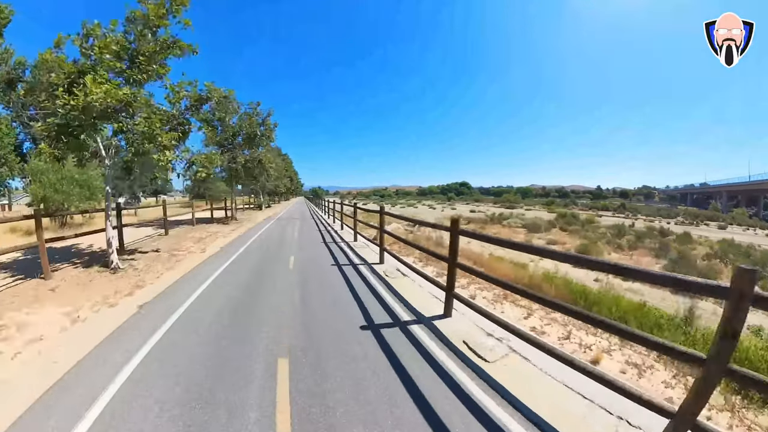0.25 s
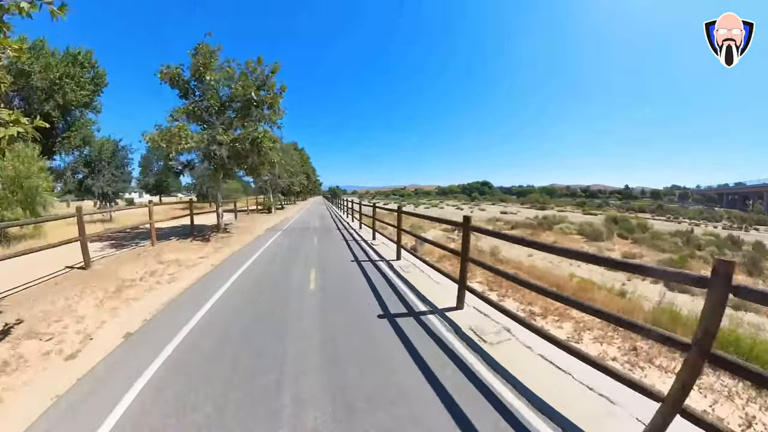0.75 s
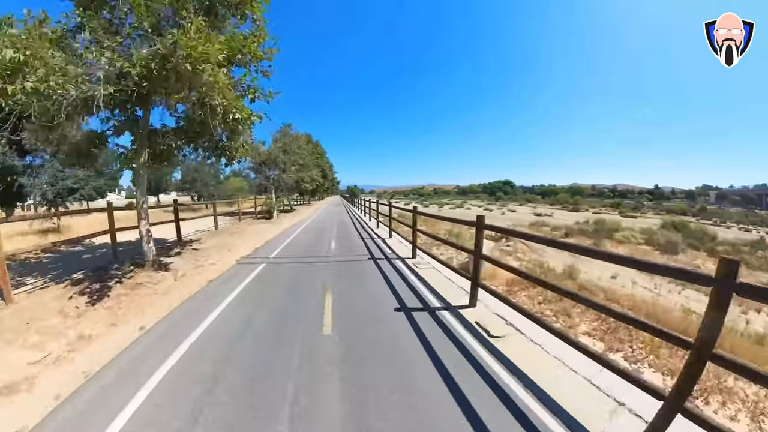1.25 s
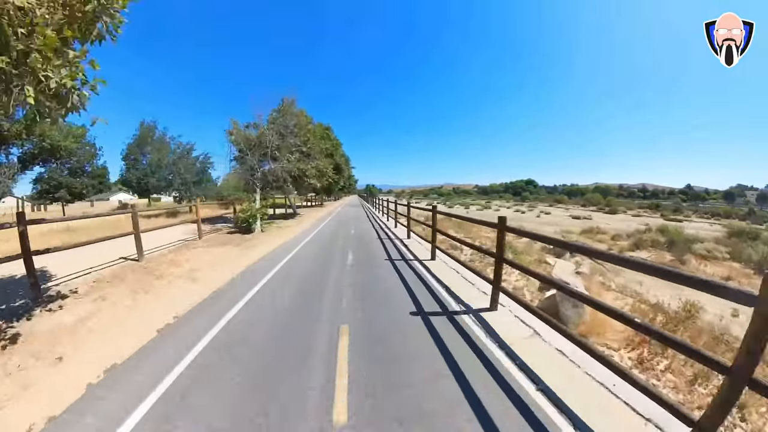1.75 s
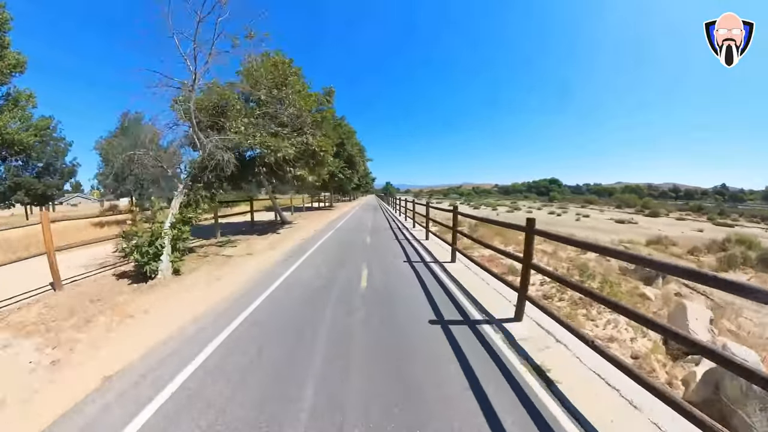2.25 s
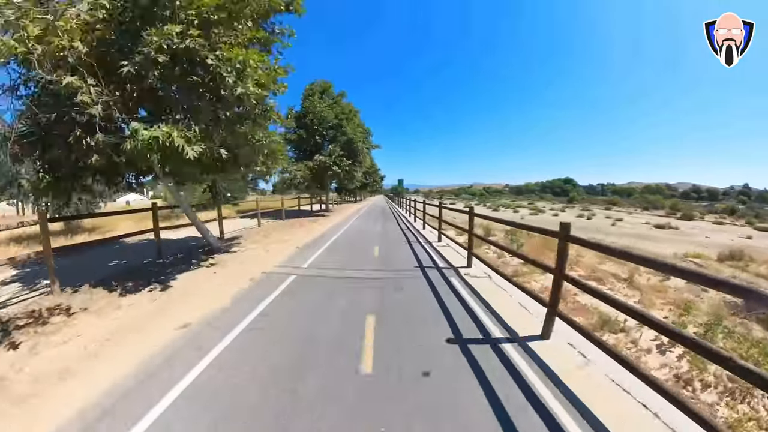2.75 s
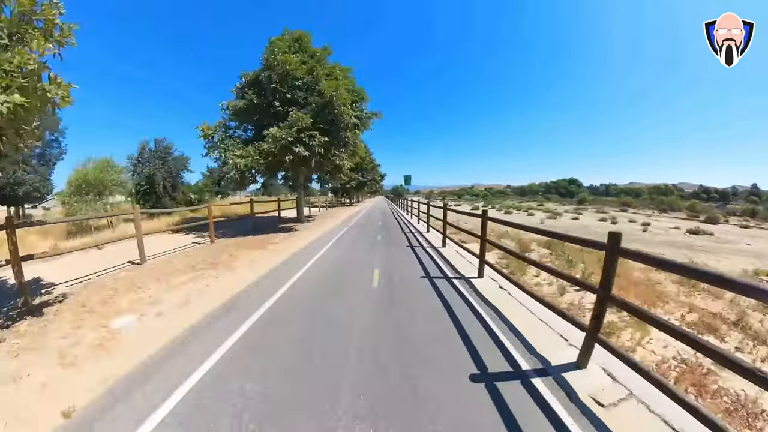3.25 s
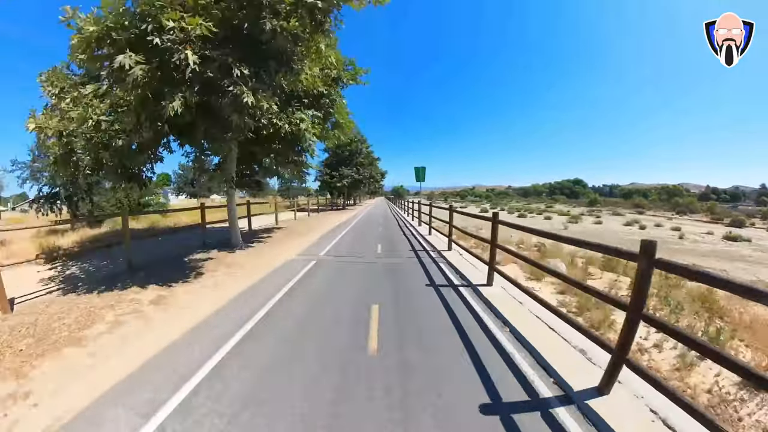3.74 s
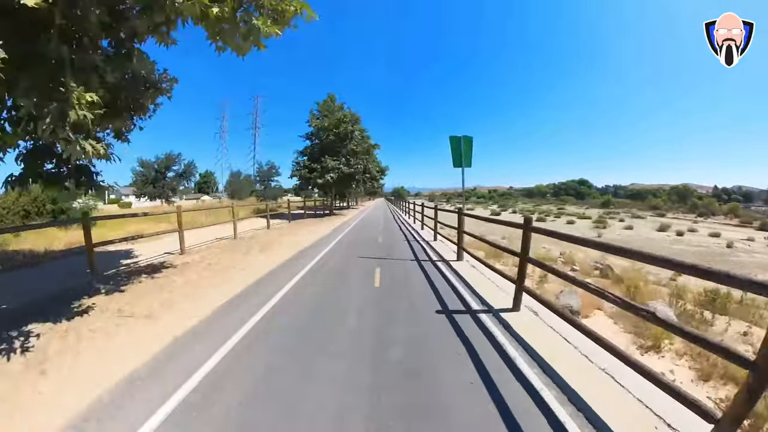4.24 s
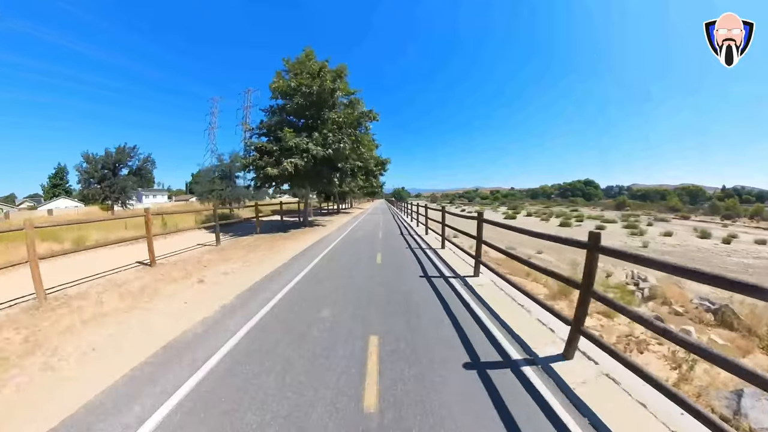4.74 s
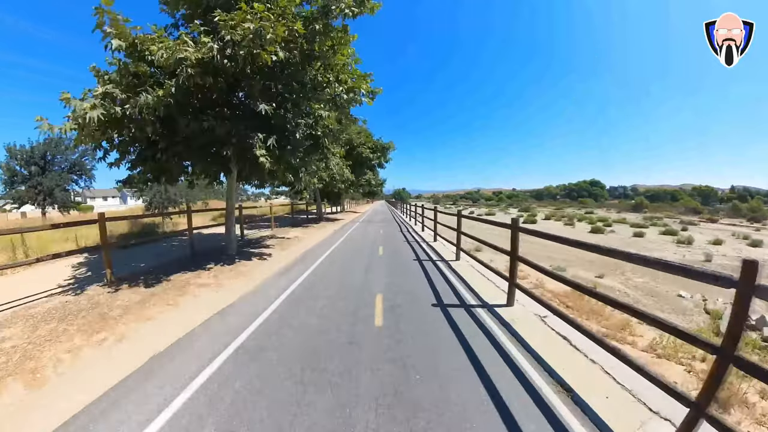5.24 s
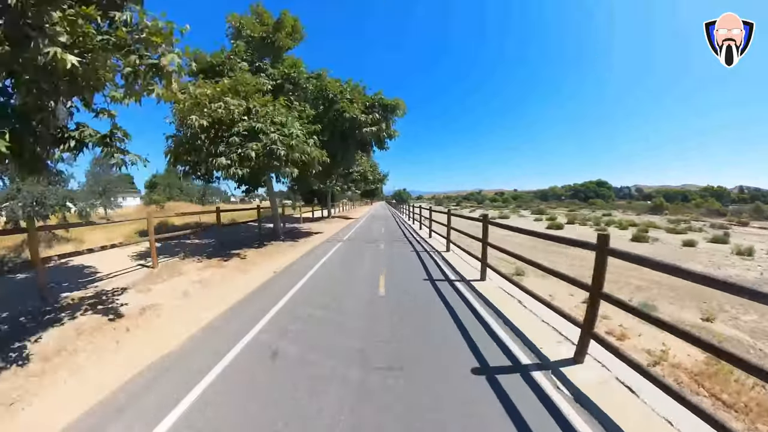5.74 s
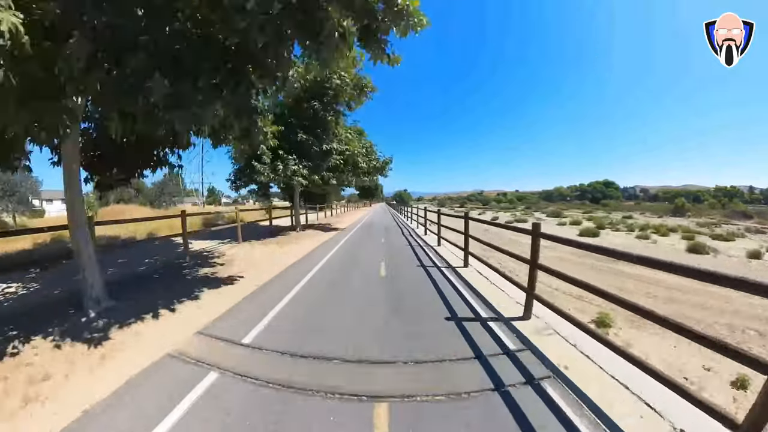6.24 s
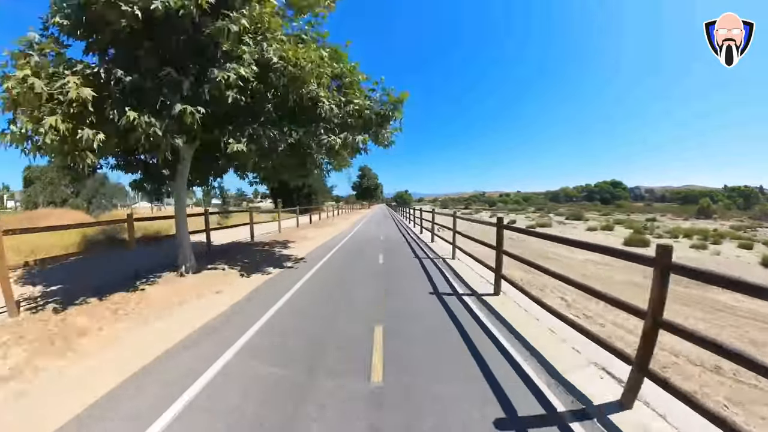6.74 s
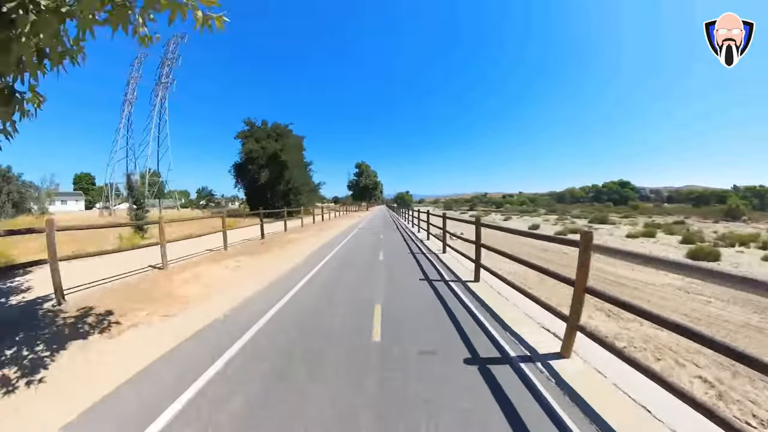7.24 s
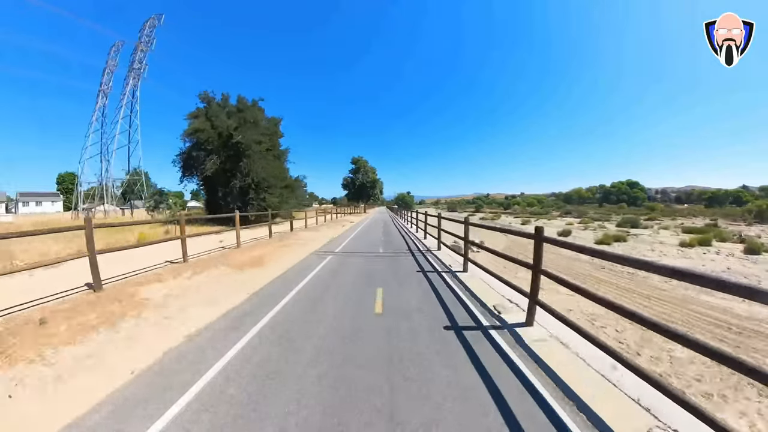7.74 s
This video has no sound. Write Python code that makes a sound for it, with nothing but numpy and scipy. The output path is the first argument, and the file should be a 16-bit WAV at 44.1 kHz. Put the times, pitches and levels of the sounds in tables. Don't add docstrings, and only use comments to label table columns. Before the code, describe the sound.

Close on the handlebar of a speeding electric scooter: motor hum climbs in pitch over booming asphalt and buffeting wind, with three hard seam thuds.

```python
import sys
import numpy as np
from scipy import signal
from scipy.fft import rfft, irfft, next_fast_len
from scipy.io import wavfile
from scipy.ndimage import uniform_filter1d, map_coordinates

SR = 44100
rng = np.random.default_rng(int(sys.argv[2]) if len(sys.argv) > 2 else 0)


def generate_wav(sig):
    pcm = np.round(np.clip(np.atleast_2d(sig).T, -1, 1) * 32767).astype(np.int16)
    wavfile.write(sys.argv[1], SR, pcm)


def volts_from_db(level):
    exponent = np.asarray(level, float) / 20
    return 10 ** exponent


N = 352359


def unit(x):
    return x / np.sqrt(np.mean(x ** 2) + 1e-20)


def along(points, hz):
    f, v = np.transpose(points)
    return np.interp(np.log(hz + 1), np.log(f + 1), v, left=-120, right=-120)


def curves(rows):
    s, *cols = np.transpose(rows)
    return [np.interp(np.arange(N) / SR, s, c) for c in cols]


def wobble(rate):
    coarse = np.arange(0, N + 32, 32)
    knots = rng.standard_normal(1600)
    return np.interp(np.arange(N), coarse, map_coordinates(knots, [coarse * rate / SR]))


def swells(rows):
    t = np.arange(N) / SR
    return sum(db * np.exp(-((t - s) / half) ** 2) for s, half, db in rows)


def filtered(x, response):
    m = next_fast_len(N + SR // 2)
    return irfft(rfft(x, m) * response(np.fft.rfftfreq(m, 1 / SR)), m)[:N]


def resonances(peaks):
    return lambda f: sum((-1) ** k * volts_from_db(db) * 1j * f * w / (c * c - f * f + 1j * f * w)
                         for k, (c, w, db) in enumerate(peaks))


def rush(spectrum, patchy_db):
    z = signal.stft(rng.standard_normal(N), nperseg=512)[2]
    field = uniform_filter1d(rng.standard_normal(z.shape), size=8, axis=0)
    field = uniform_filter1d(field, size=6, axis=1)
    patchy = signal.istft(z * volts_from_db(patchy_db * unit(field)), nperseg=512)[1][:N]
    return unit(filtered(patchy, lambda hz: volts_from_db(along(spectrum, hz))))


def add(out, s, x):
    out[round(s * SR):][:len(x)] += x


def struck(modes, spread_db, t):
    draw = rng.standard_normal(len(modes))
    return sum(volts_from_db(db + spread_db * d - 60 * t / t60) * np.sin(2 * np.pi * hz * t)
               for (hz, db, t60), d in zip(modes, draw))


def chatter(t):
    return uniform_filter1d(rng.standard_normal(len(t)), size=12)


def line(turns, db, flutter, shimmer_db):
    phase = turns + flutter * wobble(7)
    return np.sqrt(2) * volts_from_db(db + shimmer_db * wobble(13)) * np.sin(2 * np.pi * phase)


# time in seconds, front wheel speed in turns per second.
WHEEL_SPEED = [(0.0, 13.58), (0.5, 13.79), (1.0, 14.1), (1.5, 14.5), (2.0, 14.95), (2.5, 15.44),
               (3.0, 15.95), (3.5, 16.47), (4.0, 16.99), (4.5, 17.48), (5.0, 17.95), (5.5, 18.37),
               (6.0, 18.75), (6.5, 19.07), (7.0, 19.34), (7.5, 19.54), (8.0, 19.68)]


def faster():
    return curves(WHEEL_SPEED)[0] - 17


# start in seconds, hold in seconds, level change in dB.
LIGHT_SPELLS = [
    (1.974, 0.16, -6),
    (3.38, 0.058, -4),
    (4.432, 0.16, -5),
    (6.563, 0.18, -3.5),
]
LIFT_IN_S, LIFT_OUT_S = .03, 0.18


def lifted():
    t = np.arange(N) / SR
    return sum(db * np.interp(t - s, [0, LIFT_IN_S, LIFT_IN_S + hold, LIFT_IN_S + hold + LIFT_OUT_S], [0, 1, 1, 0])
               for s, hold, db in LIGHT_SPELLS)


# time in seconds, its speed over the front wheel's as a ratio.
DRIVE_SLIP = [(0, 1.021), (.75, 1.016), (6.5, 1.015), (7.2, 1.021), (8, 1.03)]
# time in seconds, frequency in Hz, level in dB.
TREAD_TONE = [(0, 370, -31), (.4, 371.5, -30), (.75, 373, -30), (1.1, 377, -28), (1.35, 380, -27),
              (1.42, 381, -70), (8, 381, -70)]
# time in seconds, level of magnetic order 10 in dB.
MOTOR_EFFORT = [(0, -9), (.3, -13), (1.0, -11.5), (1.25, -21), (1.5, -12.5), (2.0, -17), (2.3, -18),
                (3.1, -16), (3.55, -26.5), (4.25, -19), (4.5, -45), (4.75, -16), (5.6, -20.5), (6.0, -27),
                (6.3, -27), (6.75, -24), (7.0, -17), (7.6, -16.5)]
# frequency in Hz, level in dB.
STEM_ANSWER = [(260, -50), (292, -50), (302, -34.5), (325, -23), (350, -26), (375, -29.5), (410, -34.5)]
# frequency in Hz, level in dB.
DECK_ANSWER = [(700, -52), (810, -50), (850, -44), (900, -46), (950, -45), (990, -53), (1120, -56)]
USUAL_EFFORT_DB, SECOND_FOLLOWS = -18.5, .4


def motor():
    speed = curves(WHEEL_SPEED)[0] * curves(DRIVE_SLIP)[0]
    turns = np.cumsum(speed) / SR
    effort_db, = curves(MOTOR_EFFORT)
    second_db = along(STEM_ANSWER, speed * 20) + SECOND_FOLLOWS * (effort_db - USUAL_EFFORT_DB)
    whine_db = np.minimum(along(DECK_ANSWER, 55 * speed), -44) + 2.5 * lifted()
    tread_hz, tread_db = curves(TREAD_TONE)
    hum = line(10 * turns, effort_db, flutter=0.2, shimmer_db=2.5)
    hum += line(20 * turns, np.minimum(second_db, -24), flutter=.25, shimmer_db=3)
    hum += line(55 * turns, whine_db, flutter=.35, shimmer_db=5)
    hum += line(40 * turns, effort_db - 33 + 8 * (speed - 19.6), flutter=.25, shimmer_db=3)
    return hum + line(np.cumsum(tread_hz) / SR, tread_db, flutter=.1, shimmer_db=1.5)


# frequency in Hz, density in dB per Hz.
DECK_BOOM = [(56, -33.5), (95, -0.5), (108, -10), (134, 4.5), (162, -3.5), (188, -2.5), (231, -12),
             (260, -15.5), (340, -37.5), (570, -120)]
# frequency in Hz, density in dB per Hz.
STEM_DRONE = [(200, -36), (240, -15), (290, -4.5), (330, -1.5), (375, 2.5), (400, -11.5), (440, -19),
              (520, -38)]
# centre in seconds, half length in seconds, coarse and fine roughness in dB.
ASPHALT = [(.2, 0.14, -1.5, 1.5), (.6, .12, -4, 0.5), (1.2, 0.094, 0.5, 6), (1.4, .1, 3, -2.5),
           (1.85, 0.16, 4, 3), (2.4, 0.094, 5, 1), (2.6, .1, 1, -4.5), (3.0, 0.17, -1, 2.5),
           (3.4, 0.089, 2.5, -4), (3.85, 0.14, 4.5, 2), (4.4, 0.15, 2.5, 2.5), (4.95, 0.29, 1.5, 0.5),
           (5.25, 0.094, -1, -2.5), (5.8, .1, 0.5, -2), (6.17, 0.11, 1, 5), (6.8, 0.15, -0.5, -3.5),
           (7.0, .1, 2.5, -1.5), (7.6, 0.11, -2.5, 2.5)]
BOOM_DB, BOOM_PER_TURN = -15, 0.086
DRONE_DB, DRONE_PER_TURN = -22.5, 1.3


def road():
    patches = np.array(ASPHALT)
    coarse_db = swells(patches[:, :3])
    fine_db = swells(np.delete(patches, 2, axis=1))
    boom_db = BOOM_DB + BOOM_PER_TURN * faster() + coarse_db + 0.51 * lifted()
    drone_db = DRONE_DB + DRONE_PER_TURN * faster() + fine_db + 1.2 * lifted()
    boom = unit(volts_from_db(2.4 * wobble(5.5)) * rush(DECK_BOOM, patchy_db=0.82))
    drone = unit(volts_from_db(2.1 * wobble(14)) * rush(STEM_DRONE, patchy_db=2.44))
    return volts_from_db(boom_db - 1.22) * boom + volts_from_db(drone_db - 2.5) * drone


# time in seconds, level of the rush in dB.
AIRFLOW = [(0, -33), (.47, -35), (.9, -33.5), (1.31, -30), (1.5, -34.5), (1.8, -30), (2.4, -30.5),
           (2.6, -31), (3.3, -30.5), (4.27, -30), (4.92, -29), (5.3, -31.5), (5.56, -31.5), (5.8, -31.5),
           (6.3, -30.5), (6.95, -30.5), (7.5, -32.5), (7.92, -29.5)]
# centre in seconds, half length in seconds, change in dB.
PORT_EDDIES = [(0, 0.11, -19), (.29, 0.023, -2), (.44, 0.051, -13.5), (.58, 0.062, 3), (.89, 0.055, -9.5),
               (1.25, 0.12, 4), (1.96, 0.046, 8.5), (2.2, 0.1, -4), (2.4, 0.12, 0), (2.98, 0.12, 2),
               (3.34, 0.028, 10.5), (3.54, 0.041, -7), (4.45, 0.067, 7.5), (5.41, 0.032, 0),
               (5.56, 0.041, -4), (5.75, 0.093, 4), (6.27, 0.045, 1), (6.59, 0.034, 4), (6.72, .04, -11),
               (7.23, 0.051, -2), (7.61, .04, 0), (7.92, 0.041, 3.5)]
# frequency in Hz, density in dB per Hz.
PORT_BUFFET = [(12, -33), (20, -18.5), (48, 8), (96, 0.5), (115, -5), (150, -26.5), (250, -120)]
# frequency in Hz, density in dB per Hz.
WIND_RUSH = [(240, -16.5), (400, -0.5), (437, -4.5), (658, -12.5), (807, -12), (1180, -11.5), (1240, -13.5),
             (1360, -28.5), (1500, -28), (1950, -52), (3300, -120)]
# frequency in Hz, density in dB per Hz.
WIND_HISS = [(760, -34), (1300, -2.5), (1380, -7), (1600, -9), (2000, -9), (2600, -14), (3350, -21),
             (3850, -19.5), (4300, -23.5), (4700, -28), (5400, -34.5), (6500, -48.5)]
BUFFET_DB, HISS_DB, HISS_PER_TURN = -17, -17.5, 0.53


def wind():
    buffet_db = BUFFET_DB + swells(PORT_EDDIES)
    rush_db = curves(AIRFLOW)[0] + lifted()
    hiss_db = rush_db + .12 * swells(FORK_LEANS[1:]) + HISS_DB + HISS_PER_TURN * faster() + .15 * lifted()
    gust = .8 * wobble(14) + .9 * wobble(35)
    buffet = unit(volts_from_db(0.74 * wobble(22)) * rush(PORT_BUFFET, patchy_db=-1.0))
    body = unit(volts_from_db(gust) * rush(WIND_RUSH, patchy_db=1.0))
    hiss = unit(volts_from_db(0.39 * gust) * rush(WIND_HISS, patchy_db=1.5))
    return volts_from_db(buffet_db - 0.2) * buffet + volts_from_db(rush_db + 1.58) * body + volts_from_db(hiss_db + 1.4) * hiss


# frequency in Hz, density in dB per Hz.
THIN_AIR = [(3500, -27.5), (4800, -5), (5700, 0.5), (6500, -0.5), (7200, -2.5), (7800, -9), (8500, -7.5),
            (9300, -3), (10400, -6), (10950, -18), (11900, -30), (13000, -51)]
# frequency in Hz, width in Hz, level in dB.
LOOSE_STEEL = [(5690, 60, -6.5), (6840, 50, -7), (7100, 35, -5), (8690, 60, -0.5), (9150, 24, -1.5),
               (9500, 25, 0.5), (9990, 20, -9)]
AIR_DB, AIR_PER_TURN = -66, 0.68
AIR_FOLLOWS, STEEL_SHARE = 0.42, 0.48


def jingle():
    flow_db = curves(AIRFLOW)[0]
    level_db = AIR_DB + AIR_PER_TURN * faster() + AIR_FOLLOWS * (flow_db - flow_db.mean())
    level_db = level_db + .9 * lifted() + STEEL_SHARE * swells(FORK_LEANS[1:])
    singing = np.zeros(N)
    for mode in LOOSE_STEEL:
        ring = unit(filtered(rng.standard_normal(N), resonances([mode])))
        singing += volts_from_db(3.6 * wobble(6.5)) * ring * volts_from_db(mode[2])
    air = unit(volts_from_db(0.75 * wobble(13) + 0.78 * wobble(45)) * rush(THIN_AIR, patchy_db=4.0))
    return volts_from_db(level_db) * (volts_from_db(-1.0) * air + volts_from_db(-15.5) * singing)


# centre in seconds, half length in seconds, change in dB.
FORK_LEANS = [
    (.5, 0.86, 11),
    (1.42, 0.27, 12.5),
    (2.22, .08, -8.5),
    (2.8, .2, 5.5),
    (3.5, 0.091, 11.5),
    (3.97, 0.14, 13),
    (4.85, 0.15, 3),
    (6.2, 0.33, 16.5),
    (6.8, .2, 3.5),
]
# frequency in Hz, level in dB, 60 dB decay in seconds.
PAD_MODES = [(7750, -6.5, .035), (10500, 2.5, 0.033), (10800, -5, .025), (11330, -9, .05),
             (11550, -6, .055), (11780, -9, .05)]
# frequency in Hz, level in dB, 60 dB decay in seconds.
DISC_MODES = [(5690, -9, .1), (6900, -4.5, 0.12), (7160, -3.5, .12), (7200, -6, 0.11), (8640, -3.5, 0.1),
              (8500, -9, .1), (9150, -6, .2), (9420, -7.5, .2)]
FIRST_TURN = -.162
TOUCH_DB, RING_DB, RING_PER_TURN = -74.5, -6, -2


def disc():
    turns = FIRST_TURN + np.cumsum(curves(WHEEL_SPEED)[0]) / SR
    out, t = np.zeros(N + SR), np.arange(SR // 4) / SR
    touch_db = TOUCH_DB + swells(FORK_LEANS)
    ring_db = RING_DB + RING_PER_TURN * faster()
    for i in np.flatnonzero(np.diff(np.floor(turns))):
        scrape = .3 * volts_from_db(-60 * t / .012) * np.diff(rng.standard_normal(len(t) + 2), 2)
        touch = struck(PAD_MODES, 6.5, t) * (1 + .8 * chatter(t))
        touch += volts_from_db(ring_db[i]) * struck(DISC_MODES, 4.2, t) + scrape
        add(out, i / SR, volts_from_db(touch_db[i]) * touch * (1 - np.exp(-t / 0.00091)))
    return out[:N]


# start in seconds, peak level in dB.
GRIT_KNOCKS = [(0.5057, -26), (0.6779, -31), (0.8016, -32), (1.0809, -23), (1.3653, -20), (1.9809, -30),
               (2.0433, -35), (2.4354, -19), (3.0061, -26), (3.2804, -27), (3.4456, -28), (4.0193, -25),
               (4.2724, -24), (4.3504, -25), (4.3909, -27), (4.4807, -22), (4.5171, -30), (4.5555, -24),
               (4.8384, -26), (4.8963, -26), (5.0609, -21), (5.2629, -26), (5.9034, -28), (6.1334, -26),
               (6.3375, -24), (6.5849, -22), (6.5994, -28), (6.6313, -24), (6.6672, -23), (6.8907, -24)]
# frequency in Hz, width in Hz, level in dB.
PLASTIC_DECK = [(520, 190, 0), (1050, 230, 1), (1550, 330, -5), (2250, 550, -12)]
EDGE_DB = -32


def knocks():
    blows, edges, t = np.zeros(N + SR), np.zeros(N + SR), np.arange(SR // 10) / SR
    for s, db in GRIT_KNOCKS:
        width = rng.uniform(.00011, .00017)
        push = .00014 / width * np.exp(-((t - .0004) / width) ** 2)
        tail = .22 * volts_from_db(-60 * t / .03) * uniform_filter1d(rng.standard_normal(len(t)), size=6)
        add(blows, s, volts_from_db(db + 16.5) * (push + tail))
        add(edges, s, volts_from_db(db + EDGE_DB + 6 - 60 * t / .005) * np.sin(2 * np.pi * 3900 * t))
    return filtered(blows[:N], resonances(PLASTIC_DECK)) + edges[:N]


# start in seconds, peak level in dB.
SEAM_BUMPS = [
    (1.96, -10),
    (2.054, -3),
    (4.437, -8),
    (4.484, -2.5),
    (4.557, -10.5),
    (6.563, -6),
    (6.587, 1),
    (6.633, -6.5),
    (6.601, 0),
    (6.668, 0.5),
]


def thuds():
    out, t = np.zeros(N + SR), np.arange(SR // 10) / SR
    ring = sum(a * np.sin(2 * np.pi * hz * t) for hz, a in ((135, 0.78), (205, 0.89), (330, .5)))
    for s, db in SEAM_BUMPS:
        add(out, s, volts_from_db(db - 60 * t / 0.056) * ring * (1 - np.exp(-t / .001)))
    return out[:N]


# start in seconds, peak level in dB, level of the ringing bar in dB.
STEEL_CLINKS = [(2.0138, -44, -63.5), (2.021, -48.5, -72.5), (2.064, -54.5, -74), (2.123, -56, -74),
                (4.344, -54, -72), (4.4155, -40, -58), (4.461, -53.5, -63.5), (4.4963, -52.5, -60),
                (4.510, -56.5, -61.5), (6.61, -44, -66), (6.66, -56, -72), (6.703, -58.5, -66)]
# frequency in Hz, level in dB, 60 dB decay in seconds.
LATCH_MODES = [(7000, -8, .012), (7330, .5, .02), (8300, -11, .012), (8710, -9, .015), (9400, -4, .016),
               (9700, -8, .012), (10600, -1, .018), (11000, -8, .012)]
# frequency in Hz, 60 dB decay in seconds.
RINGING_BAR = (9988, .33)


def clinks():
    out, t = np.zeros(N + SR), np.arange(SR // 2) / SR
    bar_hz, bar_t60 = RINGING_BAR
    for s, db, ring_db in STEEL_CLINKS:
        clink = struck(LATCH_MODES, 3.3, t) * (1 + .7 * chatter(t))
        bar = volts_from_db(ring_db - 60 * t / bar_t60) * np.sin(2 * np.pi * bar_hz * t)
        add(out, s, volts_from_db(db - 0.5) * clink * (1 - np.exp(-t / .0009)))
        add(out, s, bar * (1 - np.exp(-t / 0.0024)))
    return out[:N]


# start in seconds, peak level in dB.
PEBBLE_HITS = [
    (3.684, -37),
    (3.6925, -44),
    (3.7035, -52),
    (4.352, -47),
    (6.6675, -46),
]
# frequency in Hz, level in dB, 60 dB decay in seconds.
MUDGUARD_MODES = [(3000, -6, .005), (4400, 0, .006), (5800, -3, .005), (7600, -6, .004), (10200, -5, .005)]


def pebble():
    out, t = np.zeros(N + SR), np.arange(SR // 2) / SR
    for s, db in PEBBLE_HITS:
        add(out, s, volts_from_db(db) * struck(MUDGUARD_MODES, 1.5, t))
    return out[:N]


def scene():
    rolling = motor() + road() + wind() + jingle() + disc()
    return (rolling + knocks() + thuds() + clinks() + pebble())[None]


def roll_off(x):
    return signal.sosfilt(signal.butter(12, 12360, fs=SR, output="sos"), x)


def record(dry):
    power = np.abs(uniform_filter1d(dry ** 2, size=1500, axis=1)) + 1e-9
    held = dry * volts_from_db(0.9) * (1 + power / volts_from_db(-16.5)) ** -.15
    soft = held / (1 + np.abs(held / 1.02) ** 7) ** (1 / 7)
    return roll_off(soft)


dry = scene()
out = record(dry)
generate_wav(out)
```